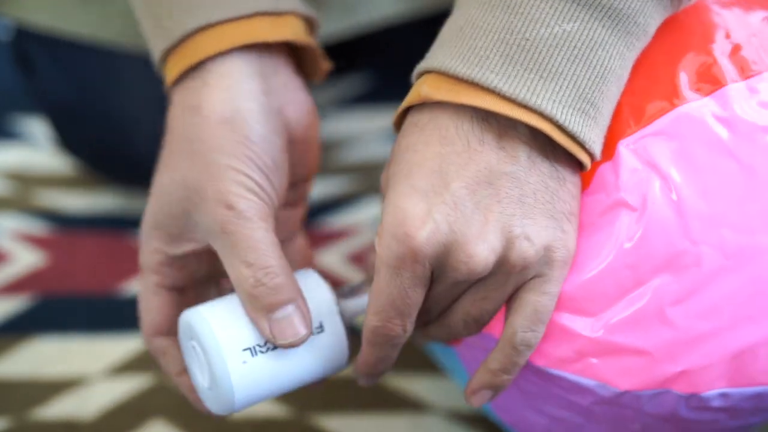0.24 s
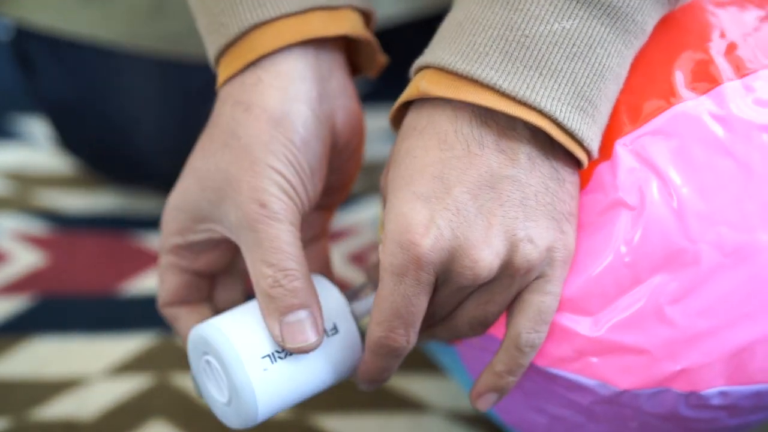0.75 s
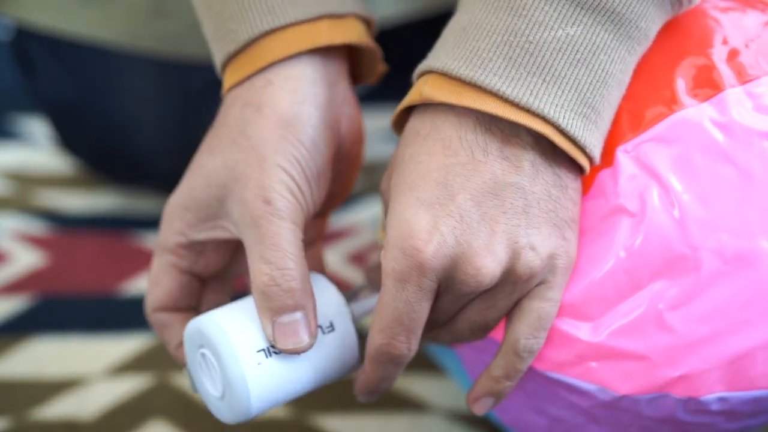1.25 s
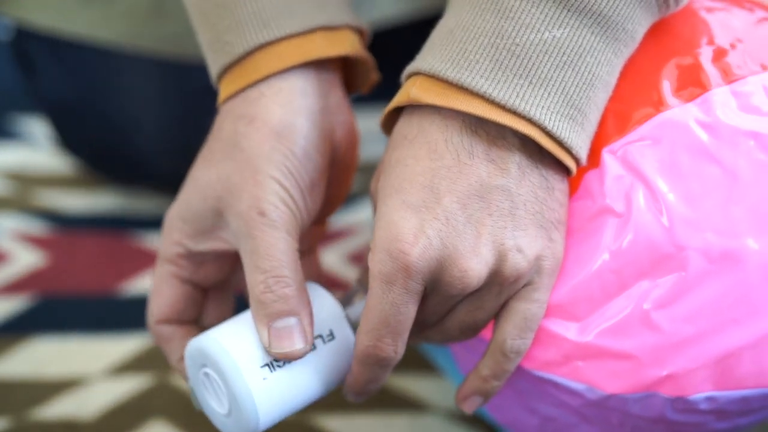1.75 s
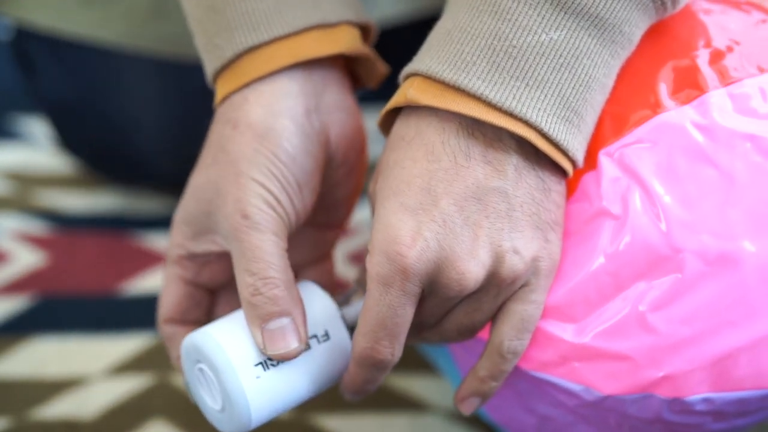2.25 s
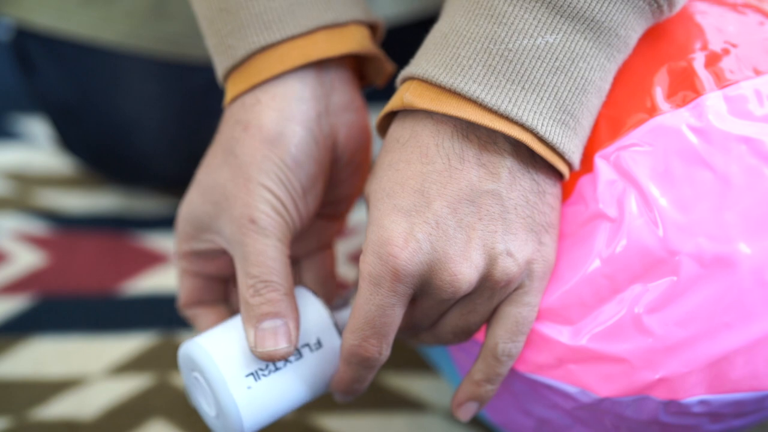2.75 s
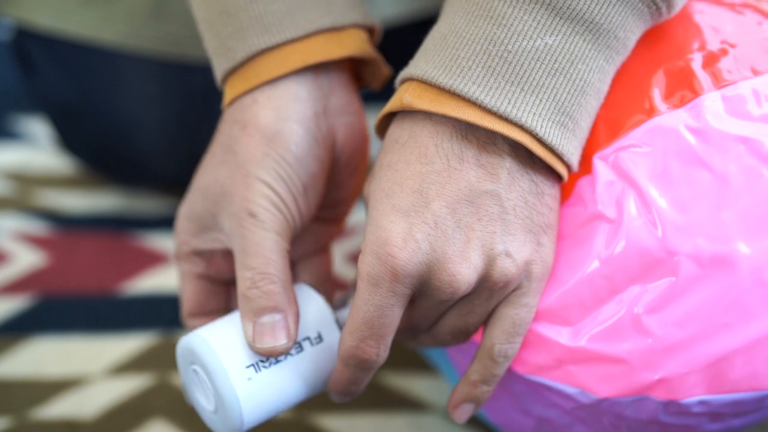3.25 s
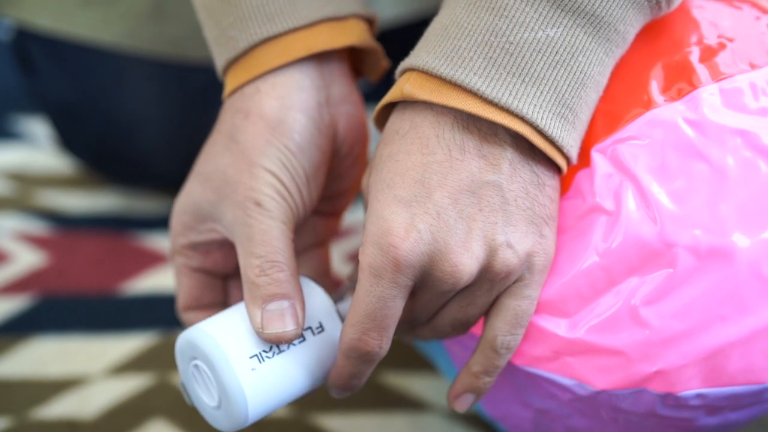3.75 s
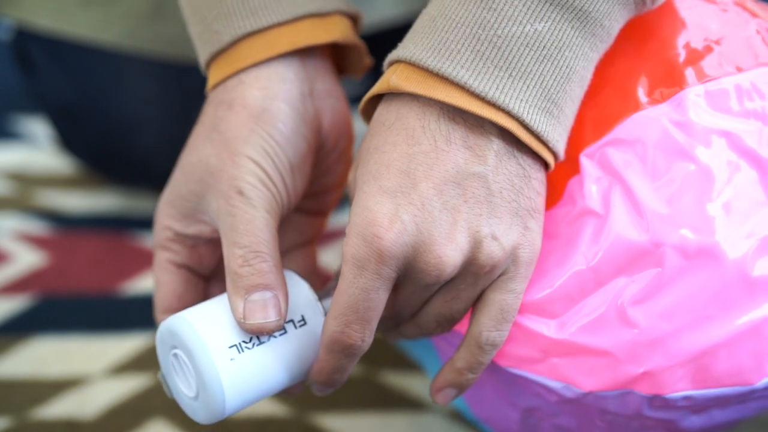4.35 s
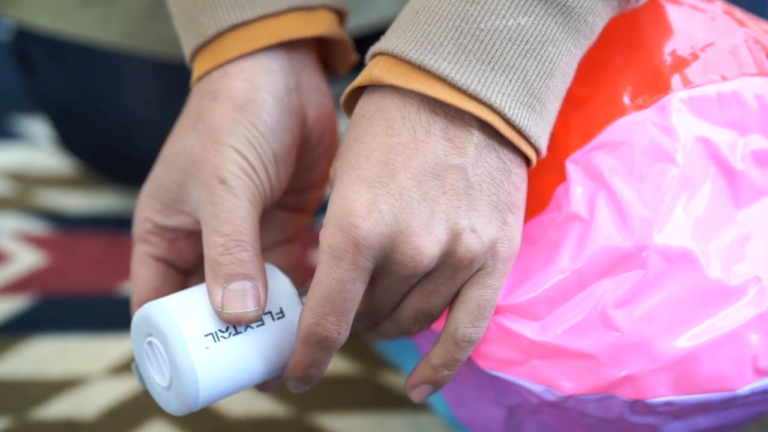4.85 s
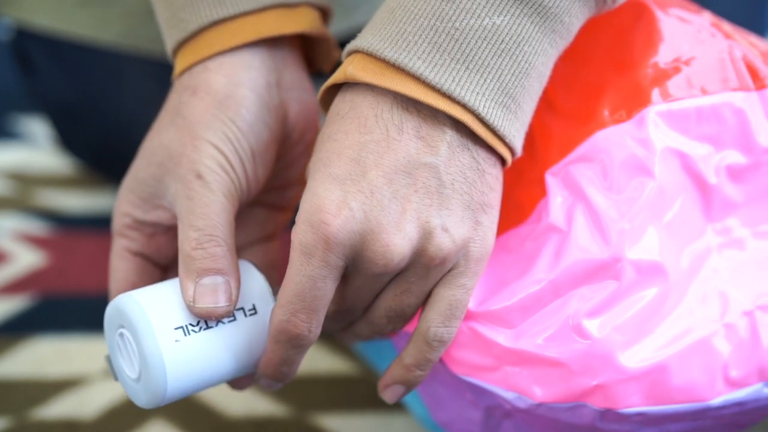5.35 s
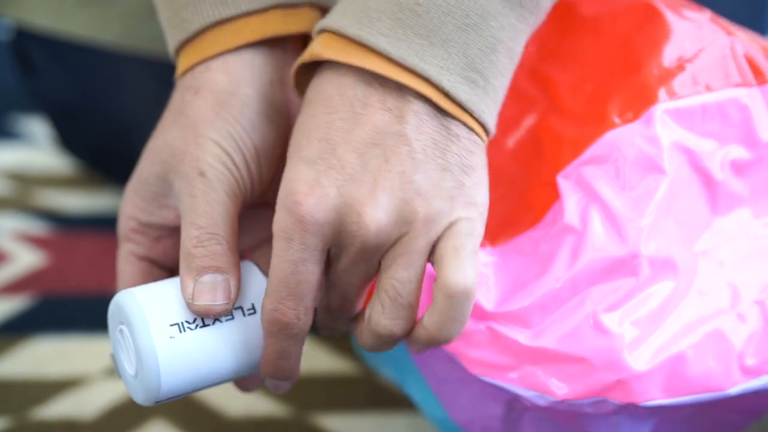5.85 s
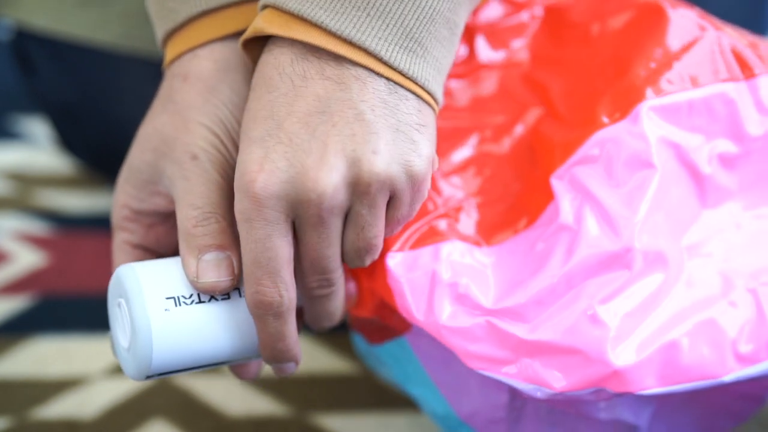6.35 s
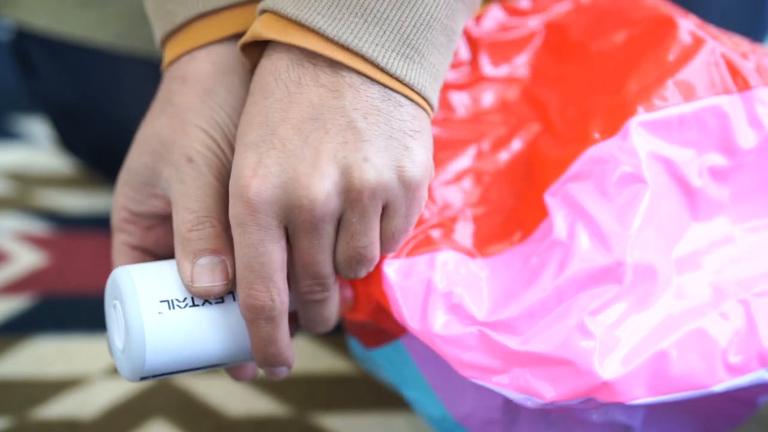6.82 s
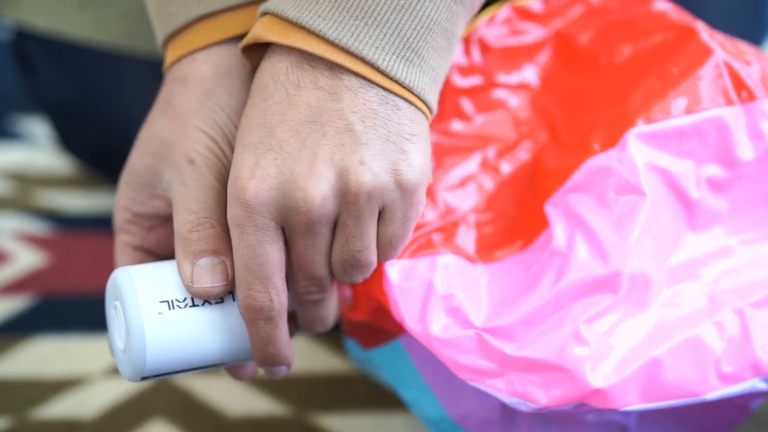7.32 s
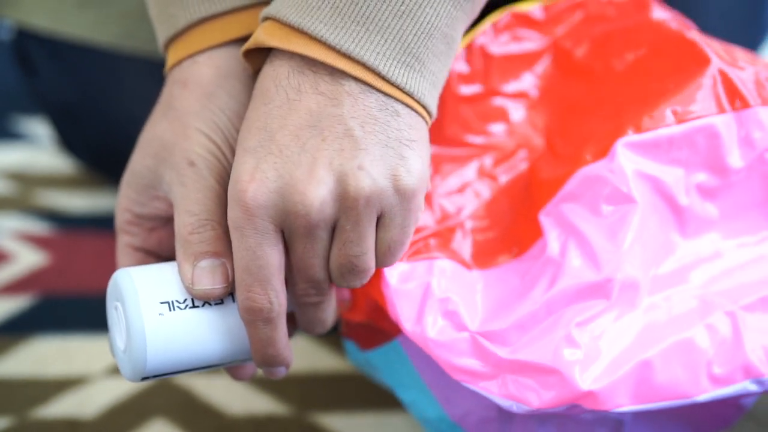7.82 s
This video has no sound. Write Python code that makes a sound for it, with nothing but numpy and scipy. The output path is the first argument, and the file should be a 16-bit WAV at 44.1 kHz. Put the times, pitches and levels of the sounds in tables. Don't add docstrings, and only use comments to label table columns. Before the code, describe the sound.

In a quiet room with faint low hum, close stereo microphones catch thin vinyl creasing and crackling, soft hand thumps and low floor rumbles. Near the middle a small electric air pump clicks into life, its whine climbing within half a second to a piercing, steady whistle wrapped in rushing air. The pump sits to the right, and its tone and hiss shift as the hands change grip.

```python
import sys
import numpy as np
from scipy import signal
from scipy.io import wavfile
from scipy.ndimage import uniform_filter1d

SR = 44100
rng = np.random.default_rng(int(sys.argv[2]) if len(sys.argv) > 2 else 0)


def nominal_scale(level):
    x = np.asarray(level, float) / 20
    return 10 ** x


def put_to_file(sound):
    columns = np.atleast_2d(sound).T
    safe = np.clip(columns, -1, 1)
    whole_steps = np.round(safe * 32767)
    wavfile.write(sys.argv[1], SR, whole_steps.astype(np.int16))


N = 356328

# frequency in Hz, density in dB per Hz
ROOM_SPECTRUM = [(12, -28), (20, 0.5), (86, -9), (123, -4), (150, -13.5), (301, -11.5), (367, -15),
                 (434, -12.5), (499, -18), (1220, -19.5), (3440, -27), (12100, -37.5), (16000, -22)]
# frequency in Hz, likeness of the two microphones from 0 to 1
ROOM_LIKENESS = [(60, 0.051), (180, 0.69), (550, 0.64), (1650, 0.59), (4970, 0.22), (15000, 0.07)]
# time in seconds, level in dB
ROOM_LEVEL = [(0.0, -43.5), (.16, -46.5), (3.7, -46.3), (4.1, -48.5), (4.8, -47.5), (5.7, -53.5),
              (8.08, -51.5)]
ROOM_PAN_DB = 2

# peak in seconds, level in dB
WEIGHT_SHIFTS = [(0.0, -34), (1.02, -37), (1.2, -35.5), (1.68, -38), (1.86, -39.5), (2.27, -34.5),
                 (2.4, -40), (2.9, -36), (3.33, -43), (3.48, -31.5)]
SHIFT_RISE_DB_PER_S, SHIFT_FALL_DB_PER_S, RUMBLE_DB = 150, 46, -44

# start in seconds, dull part in dB, bright part in dB, left minus right in dB
CREASES = [(.146, -39, -50, .5), (0.179, -27.5, -46, -11), (.448, -23, -33, 2), (0.586, -34, -60, 3),
           (0.754, -49, -36, 6), (.759, -36, -30.5, 6), (.923, -30.5, -52, 4), (1.445, -42, -41.5, 4),
           (1.692, -44.5, -49, 2.5), (1.73, -35.5, -39, 4), (2.041, -47, -48.5, 3),
           (2.058, -47, -40.5, -1.5), (2.17, -41, -41.5, 2), (2.436, -35, -45, 10), (2.524, -32, -54, 1),
           (2.568, -36, -44, 0), (2.634, -38.5, -43, 5), (3.121, -36.5, -35.5, 5), (3.156, -38, -30, -4),
           (3.326, -44, -30.5, 6.5), (3.352, -24, -30, -8), (3.429, -34, -28.5, -4), (3.642, -33.5, -38, 5),
           (3.658, -26.5, -32.5, -12)]
DULL_DECAY_S, BRIGHT_DECAY_S = 0.0076, 0.035
# start in seconds, dull part in dB
FOLDS = [(.12, -41), (.218, -40.5), (.24, -38), (.567, -51), (.808, -40.5), (1.065, -42), (1.241, -50),
         (1.371, -40.5), (1.665, -40.5), (2.018, -43), (2.459, -43), (2.91, -42), (2.994, -40.5),
         (3.076, -42), (3.205, -40), (3.274, -45), (3.497, -45), (3.577, -51), (3.598, -44)]
FOLD_BRIGHT_DB, FOLD_PAN_DB, FOLD_DECAY_S = -14, 5, 0.023

# time in seconds, level in dB, swing in Hz
HAND_KNOCKS = [
    (3.382, -31, 90),
    (3.5, -24, 43.7),
    (0.147, -26, 303),
    (0.22, -29.5, 350),
    (3.549, -22, 200),
    (3.64, -37, 40),
    (7.549, -33, 40),
]

# left delay in ms, left level in dB, right delay in ms, right level in dB
REFLECTIONS = [(1.635, 2, 2.4, -11.5), (3.95, -16, 2.8, -18), (7.964, 0.5, 6.5, -12.5),
               (11.265, -12, 4.9, -9)]

# time in seconds, speed in turns per second
FREE_SPEED = [(3.85, 633), (4.0, 640), (4.16, 629.1), (4.24, 627.5), (4.48, 632.2), (4.76, 633.2),
              (4.86, 637.6), (5.46, 629.6), (5.6, 631.9), (6.16, 633.8), (6.44, 639.5), (6.82, 642.9),
              (7.08, 640.6), (7.2, 642.3), (7.44, 638.2), (7.74, 641), (8.05, 639.7)]
SWITCH_S, SPIN_UP_S = 3.63, 0.255
BLADES = 9
# time in seconds, left level in dB, right level in dB, extra path to the left microphone in cm
BLADE_TONE = [(3.72, -23, -13, 15), (3.86, -16, -9, 18.54), (4.0, -13, -10, 14.95), (4.12, -24, -12, 21.2),
              (4.36, -25, -16.5, 19.2), (4.46, -12, -12, 19.14), (4.68, -10.5, -24, 19.5),
              (4.81, -17, -17.5, 24.2), (4.9, -15.5, -16, 25.9), (5.04, -25, -12.5, 24.7),
              (5.24, -11.5, -9, 27.3), (6.08, -23.5, -13, 26.6), (6.3, -9, -12.5, 27.69),
              (6.46, -22.5, -13, 29.1), (6.902, -16.5, -16, 32.1), (7.24, -10, -16, 32.5),
              (7.5, -15, -23.5, 31.8), (7.9, -14, -30, 31)]
BLADE_OVERTONE = [(3.7, -26, -18, 17.5), (3.77, -30, -34, 13), (3.81, -24, -12, 15.7),
                  (3.92, -38, -44, 16.3), (4.04, -42, -20, 17.0), (4.16, -40, -15.5, 17.4),
                  (4.32, -33, -30, 19.5), (4.56, -41, -36.5, 16.6), (4.68, -48, -28, 18.8),
                  (4.9, -28, -30.5, 19.8), (5.1, -40, -33, 18.6), (5.8, -44, -34, 21), (6.2, -46, -36, 21),
                  (6.65, -31, -42, 19), (6.95, -47, -31.5, 21.3), (7.25, -41, -33, 22.4),
                  (7.45, -45, -37.5, 21.7), (8.05, -39, -35, 22.4)]
SHAFT_TONE = [(3.76, -45, -35, 10.0), (3.87, -30, -29, 4.3), (4.0, -41, -39, 11.3),
              (4.28, -35, -34.5, 11.3), (6.3, -49.5, -44.5, 18.9), (8.05, -48, -40, 21.0)]
FORCE_DB_PER_DECADE, OVERTONE_WANDER_DB = 40, 1.5
# multiple of shaft speed, level in dB in the first grip, in dB in the second grip
SIDE_ORDERS = [(2, -58, -51), (3, -48, -54), (5, -52, -62), (6, -62, -46), (7, -56, -54), (8, -60, -39),
               (10, -60, -58), (17, -58, -57), (19, -62, -64), (23, -56, -53), (27, -38, -60)]
# frequency in Hz, gain in dB
CLIMB_GAIN = [(1000, 3), (1700, -6), (2200, 6.5), (2700, -10), (3700, -15.5), (4200, 4), (4700, -0.5),
              (6500, 0)]

# time in seconds, level in dB, share of the second grip from 0 to 1
AIR_FLOW = [(3.66, -51, 0.2), (3.72, -39, 0.5), (3.82, -27, .35), (3.94, -31, 0.37), (4.02, -25, 0.25),
            (4.11, -29, 0.6), (4.24, -23, .45), (4.38, -25.5, 0.37), (4.52, -23.5, 0.6), (5.0, -24, 0.44),
            (5.14, -27.5, .5), (6.2, -26, 0.76), (6.5, -25.5, 0.97), (7.1, -25.5, 1), (8.08, -26, 1)]
# first grip in Hz, second grip in Hz, width in Hz, first level in dB, second level in dB
INLET = [(370, 325, 430, -21.5, -24), (1412, 1212, 530, -9, -13.5), (1840, 2011, 408, -38, -1.5),
         (2092, 2123, 511, -2, 0)]
HOUSING = [(3110, 3310, 490, -6.5, -11.5), (4160, 3972, 450, 1, 1), (4496, 4600, 210, 5.5, -7),
           (4920, 5570, 1600, -6, -6)]
OUTLET = [(6020, 4065, 590, -0.5, 3), (6590, 6890, 820, 1.5, -2), (8220, 8600, 1020, 0.5, -5.5),
          (9750, 9770, 1110, -7, -7.5), (13300, 12500, 2500, -20.5, -19.5)]
INLET_DB, HOUSING_DB, OUTLET_DB = -0.08, -2.25, -1.08
# time in seconds, gain in dB
FINGER_COVER = [(4.55, 2), (4.85, 0.5), (5.5, 1.5), (5.9, -0.5), (6.5, -2), (7.05, 1), (8.08, 1)]


def in_time(rows):
    s, *columns = np.transpose(rows)
    return [np.interp(np.arange(N) / SR, s, column) for column in columns]


def at_hz(points, hz):
    point_hz, values = np.transpose(points)
    return np.interp(np.log(hz), np.log(point_hz + 1), values)


def rms_one(x):
    return x / np.sqrt(np.mean(x ** 2) + 1e-20)


def drift(rate_hz):
    r = np.exp(-2 * np.pi * rate_hz * 40 / SR)
    white = rng.standard_normal(N // 40 + 2002)
    slow = signal.lfilter([1], [1, -2 * r, r * r], white)[2000:]
    return np.interp(np.arange(N) / 40, np.arange(len(slow)), rms_one(slow - slow.mean()))


def band(x, low_hz, high_hz):
    sos = signal.butter(2, [low_hz, min(high_hz, 0.47 * SR)], "band", fs=SR, output="sos")
    return signal.sosfilt(sos, x)


def resonance(x, hz, width_hz):
    r = np.exp(-np.pi * width_hz / SR)
    b = (1 - r * r) / 2 * np.array([1, 0, -1])
    a = [1, -2 * r * np.cos(2 * np.pi * hz / SR), r * r]
    return signal.lfilter(b, a, signal.lfilter(b, a, x))


def late(x, samples):
    return np.interp(np.arange(len(x)) - samples, np.arange(len(x)), x)


def room():
    out = 0
    edges = 20 * 2 ** np.arange(0, 10, 0.5)
    white = rng.standard_normal((2, 2, N))
    for k, (low, high) in enumerate(zip(edges, edges[1:])):
        mid, side = band(white[k % 2], low, high)
        hz = np.sqrt(low * high)
        alike = np.clip(at_hz(ROOM_LIKENESS, hz), -1, 1)
        lumps_db = (2.4 if hz < 60 else 0.9) * drift(1.26)
        stereo = np.sqrt(1 + alike) * mid + np.sqrt(1 - alike) * side * [[1], [-1]]
        out = out + nominal_scale(at_hz(ROOM_SPECTRUM, hz) + lumps_db) * stereo
    hum = nominal_scale(-9.0 + 1.6 * drift(4.9)) * np.sin(2 * np.pi * 120 * np.arange(N) / SR)
    level_db, = in_time(ROOM_LEVEL)
    return nominal_scale(level_db + 5.0 + ROOM_PAN_DB * np.array([[0.5], [-0.5]])) * (rms_one(out) + hum)


def rumble():
    t = np.arange(N) / SR
    swells = [db - np.maximum(SHIFT_RISE_DB_PER_S * (s - t), SHIFT_FALL_DB_PER_S * (t - s))
              for s, db in WEIGHT_SHIFTS]
    steady_db = RUMBLE_DB - 60 * np.maximum(t - 3.9, 0)
    level_db = np.max(swells + [steady_db], axis=0)
    low = band(rng.standard_normal((2, N)), 12, 42)
    return rms_one(low) * nominal_scale(level_db + np.array([[0.0], [-8.0]]))


def vinyl():
    out = np.zeros((2, N))
    t = np.arange(int(0.12 * SR)) / SR
    rows = []
    for s, dull_db, bright_db, pan_db in CREASES:
        decay_s = BRIGHT_DECAY_S if bright_db > dull_db - 5 else DULL_DECAY_S
        rows.append((s, dull_db, bright_db, pan_db, decay_s))
    rows += [(s, dull_db, dull_db + FOLD_BRIGHT_DB, FOLD_PAN_DB, FOLD_DECAY_S) for s, dull_db in FOLDS]
    for s, dull_db, bright_db, pan_db, decay_s in rows:
        noise = rng.standard_normal((3, len(t)))
        envelope = nominal_scale(-60 * t / decay_s) * (1 - np.exp(-t * 30 / decay_s))
        burst = (noise[0] + 0.5 * noise[1:]) * envelope
        ring = resonance(noise[1:] * nominal_scale(-60 * t / (2.4 * decay_s)), 7000, 1900)
        dull = nominal_scale(dull_db) * band(burst, 540, 4360) * 1.86
        bright = nominal_scale(bright_db) * (band(burst, 2400, 12400) + 1.03 * ring)
        at = int(s * SR) - 40
        out[:, at:at + len(t)] += nominal_scale(5.5 + pan_db * np.array([[0.5], [-0.5]])) * (dull + bright)
    ticking = rng.random(N) < 70 * nominal_scale(6.0 * drift(3.0)) / SR
    ticks = ticking * nominal_scale(4.5 * np.minimum(rng.exponential(1, N), 2.5))
    crackle = band(ticks * rng.choice([-1, 1], N), 500, 3500)
    return out + nominal_scale([[-40.0], [-43.0]]) * crackle


def knocks():
    out = np.zeros(N)
    t = np.arange(int(0.1 * SR)) / SR
    for s, db, hz in HAND_KNOCKS:
        at = int(s * SR - SR / hz / 4)
        out[at:at + len(t)] += nominal_scale(db) * np.sin(2 * np.pi * hz * t) * np.exp(-(t * hz / 0.81) ** 2)
    return out * nominal_scale([[2.0], [-4.0]])


def running(fade_s=0.023):
    return np.clip((np.arange(N) / SR - SWITCH_S - 0.01) / fade_s, 0, 1)


def echo_ripple(hz):
    columns = np.transpose(REFLECTIONS)
    ms, level_db = columns[0::2, :, None], columns[1::2, :, None]
    paths = nominal_scale(level_db) * np.exp(-2j * np.pi * ms * hz[::32] / 1000)
    ripple = 10 * np.log10(np.abs(1 + paths.sum(axis=1)) ** 2 + 1e-3)
    ripple = ripple - uniform_filter1d(ripple, size=138, axis=1)
    ripple = np.array([np.interp(np.arange(N) / 32, np.arange(len(r)), r) for r in ripple])
    return ripple + at_hz(CLIMB_GAIN, hz)


def motor():
    since_switch = np.maximum(np.arange(N) / SR - SWITCH_S, 0.01)
    speed = in_time(FREE_SPEED)[0] * np.tanh(since_switch / SPIN_UP_S)
    angle = 2 * np.pi * np.cumsum(speed * (1 + 0.00046 * drift(33.0))) / SR
    force_db = FORCE_DB_PER_DECADE * np.log10(speed / 640)
    out = np.zeros((2, N))
    for multiple, table in ((BLADES, BLADE_TONE), (2 * BLADES, BLADE_OVERTONE), (1, SHAFT_TONE)):
        left_db, right_db, path_cm = in_time(table)
        level_db = np.array([left_db, right_db]) + force_db + 0.71 * drift(28.0)
        if multiple > 1:
            level_db += echo_ripple(multiple * speed) * BLADES / multiple
        if multiple > BLADES:
            level_db += OVERTONE_WANDER_DB * np.array([drift(2.5), drift(2.5)])
        lag = 2 * np.pi * multiple * speed * path_cm / 34300
        out += nominal_scale(level_db) * np.sin(multiple * angle - lag * [[1], [0]])
    grip, = in_time([(6.1, 0), (6.45, 0.8), (7.0, 1)])
    for multiple, first_db, second_db in SIDE_ORDERS:
        level_db = first_db + (second_db - first_db) * grip + 2.4 * np.array([drift(2.5), drift(2.5)])
        level_db += 0.42 * force_db + echo_ripple(multiple * speed)
        heard = multiple * speed < 0.36 * SR
        out += heard * nominal_scale(level_db) * np.sin(round(multiple) * angle + rng.uniform(0, 2.5, (2, 1)))
    return np.sqrt(2) * out * running()


def reflected(x, share_db):
    out = []
    for c, direct in enumerate(x):
        echoes = [nominal_scale(row[2 * c + 1] + share_db) * late(direct, row[2 * c] * SR / 1000) for row in REFLECTIONS]
        out.append(direct + sum(echoes))
    return np.array(out)


def air():
    start = int(3.6 * SR)
    flow_db, grip = [column[start:] for column in in_time(AIR_FLOW)]
    grip = np.clip(grip, 0, 1)
    housing_db = HOUSING_DB + in_time(FINGER_COVER)[0][start:]
    near, diffuse = 0, 0
    gust = drift(26.0)[start:]
    for modes, part_db in ((INLET, INLET_DB), (HOUSING, housing_db), (OUTLET, OUTLET_DB)):
        white = rng.standard_normal((2, N - start))
        group = 0
        for k, (hz, hz_2, width_hz, db, db_2) in enumerate(modes):
            first = nominal_scale(db) * resonance(white, hz, width_hz)
            second = nominal_scale(db_2) * resonance(white, hz_2, width_hz)
            patchy = nominal_scale(hz / 4500 * drift(4.0)[start:])
            group = group + (-1) ** k * patchy * ((1 - grip) * first + grip * second)
        level_db = flow_db + part_db + 0.5 * gust + 0.53 * drift(32.0)[start:]
        direct, scattered = rms_one(group) * nominal_scale(level_db)
        near, diffuse = near + direct, diffuse + scattered
    round_path = nominal_scale(-9.5) * late(band(near, 160, 6000), 23.65)
    short_path = late(nominal_scale(-13.5) * near + nominal_scale(-5.5) * band(near, 5400, 11500), 2.59)
    left = round_path + short_path + nominal_scale(-10.5) * band(diffuse, 3300, 19600) + nominal_scale(-14.0) * diffuse
    return np.pad(reflected([left, near], share_db=-7.0), ((0, 0), (start, 0))) * running()


def scene():
    return room() + rumble() + vinyl() + knocks() + motor() + air()


def low_pass(x):
    return signal.sosfilt(signal.butter(12, 15900, fs=SR, output="sos"), x)


def record(dry):
    return low_pass(dry)


dry = scene()
out = record(dry)
put_to_file(out)
```